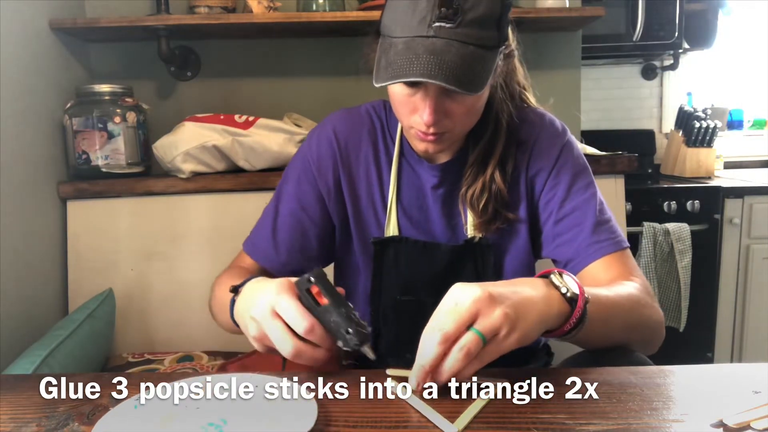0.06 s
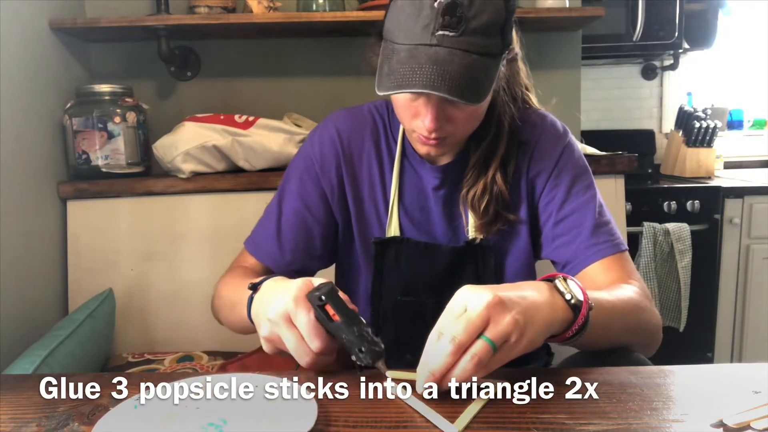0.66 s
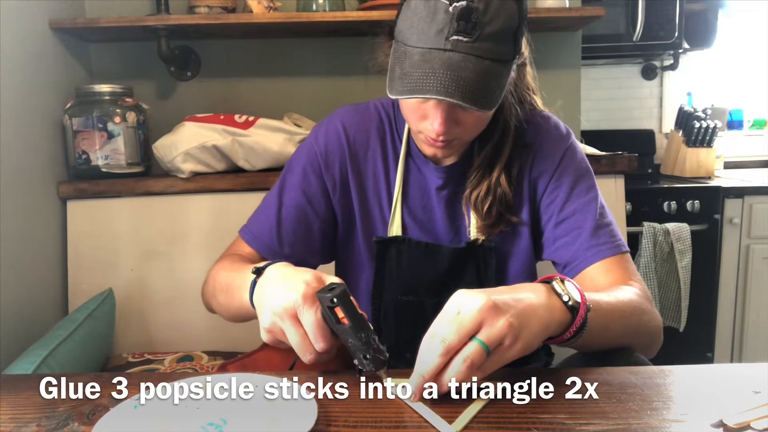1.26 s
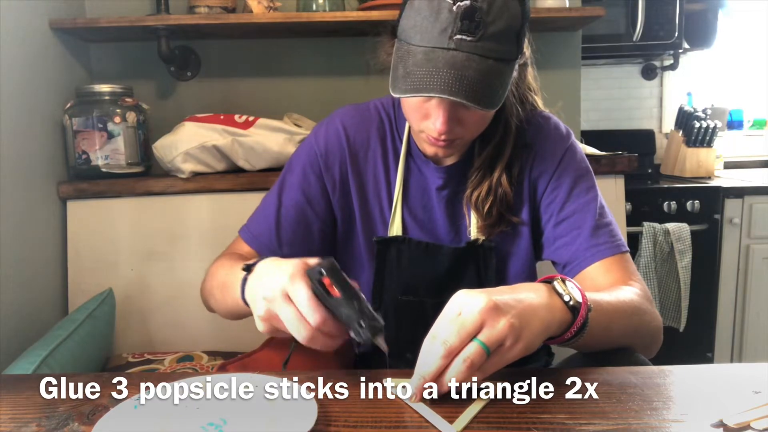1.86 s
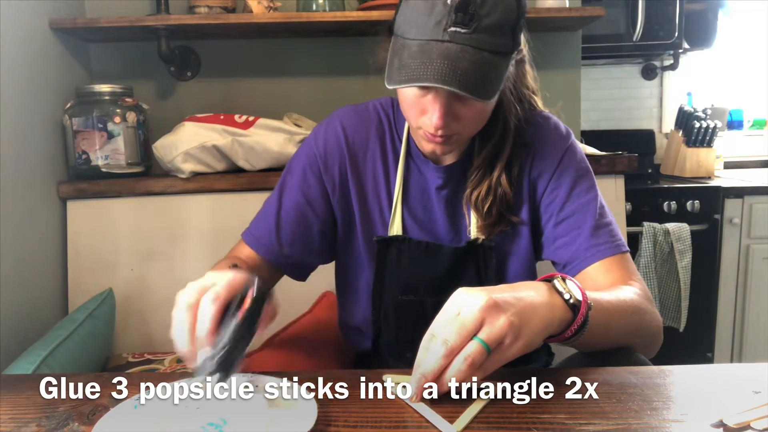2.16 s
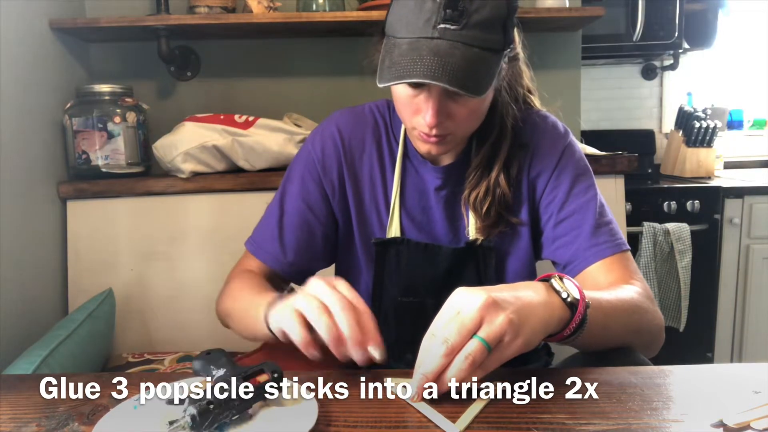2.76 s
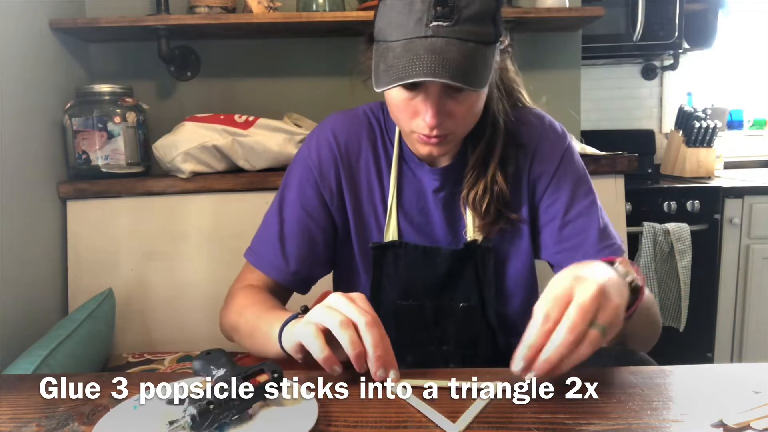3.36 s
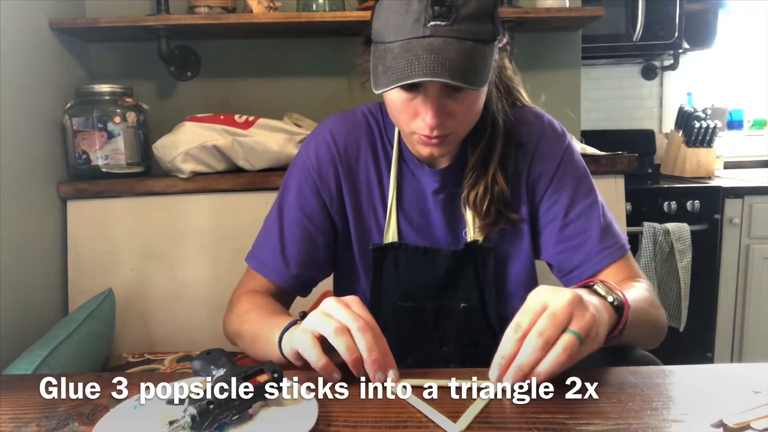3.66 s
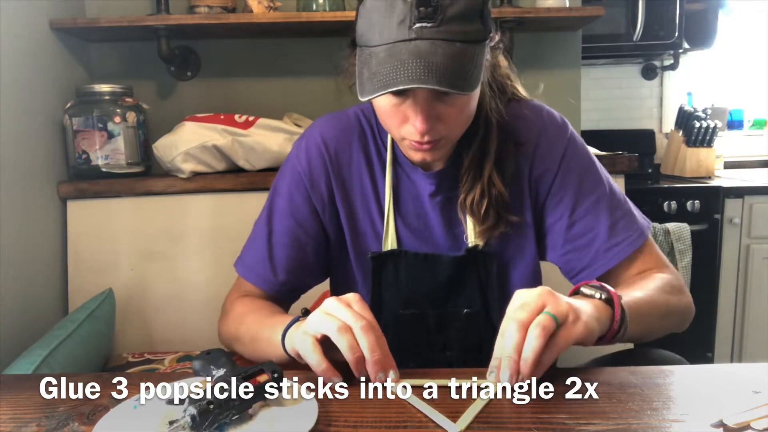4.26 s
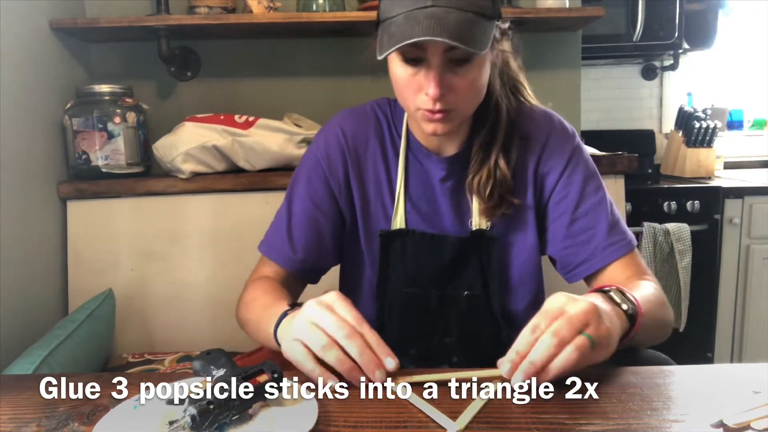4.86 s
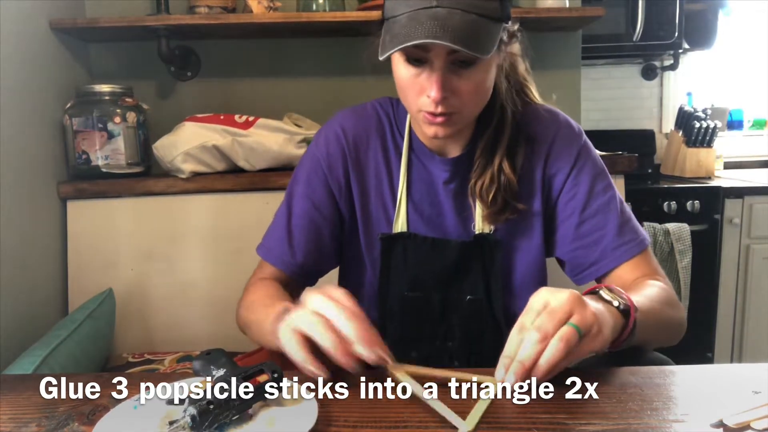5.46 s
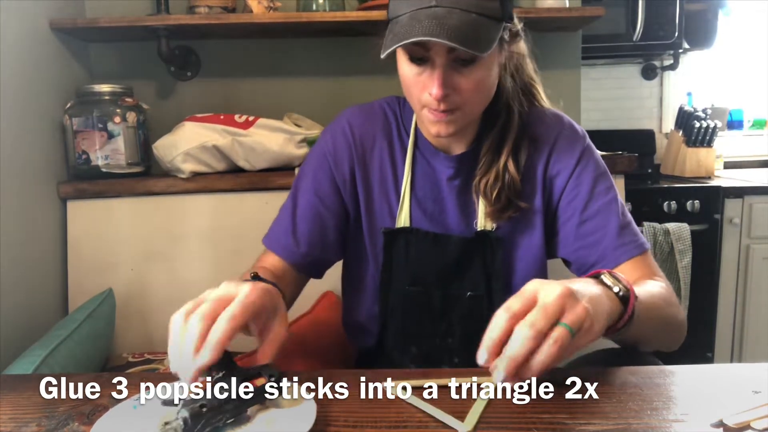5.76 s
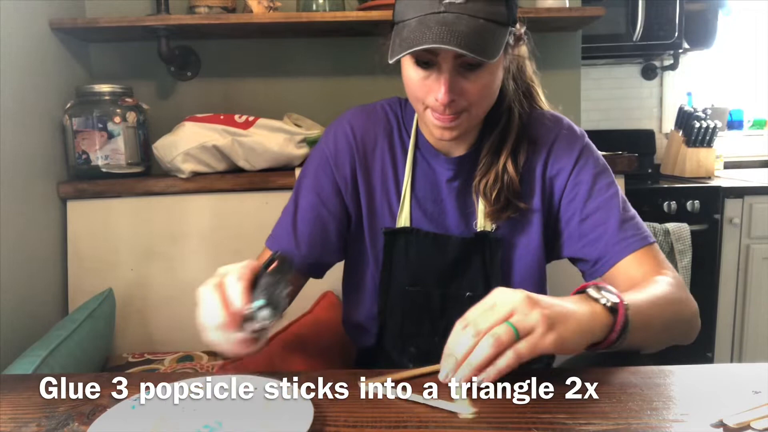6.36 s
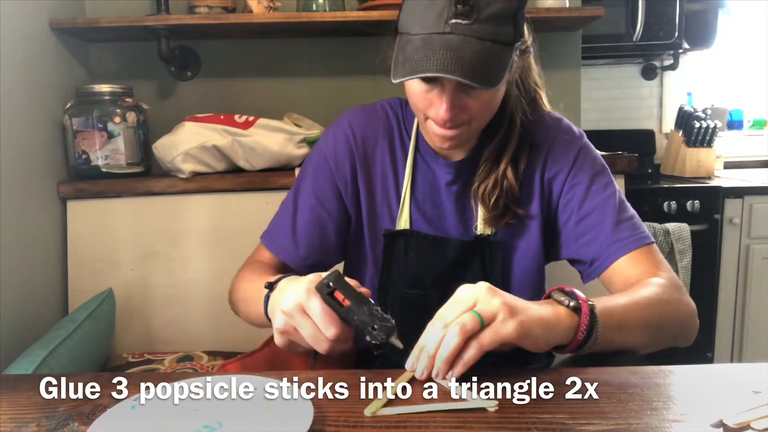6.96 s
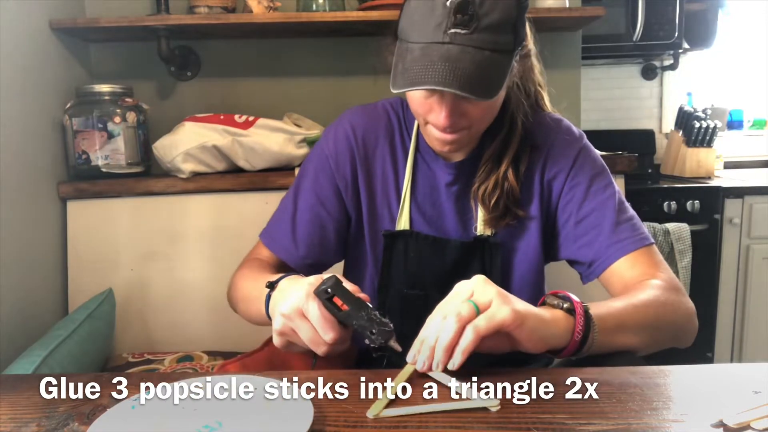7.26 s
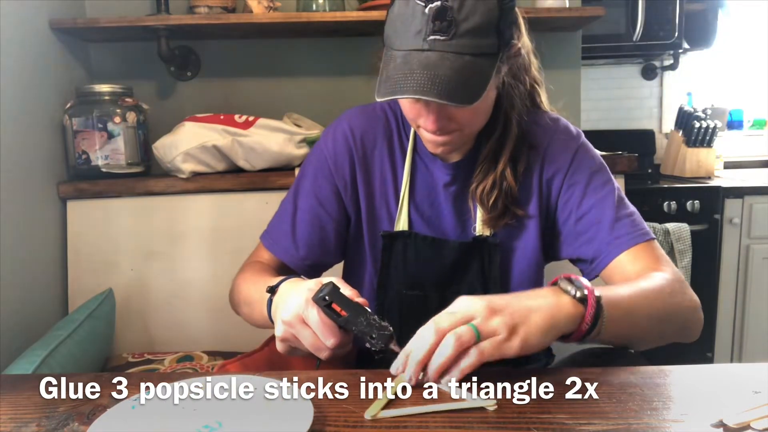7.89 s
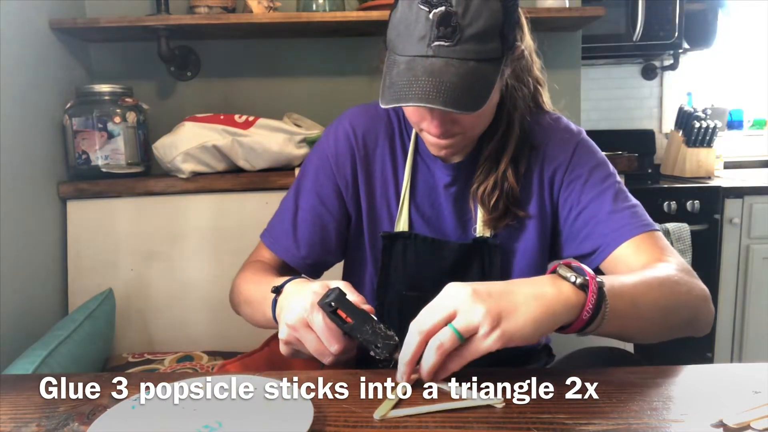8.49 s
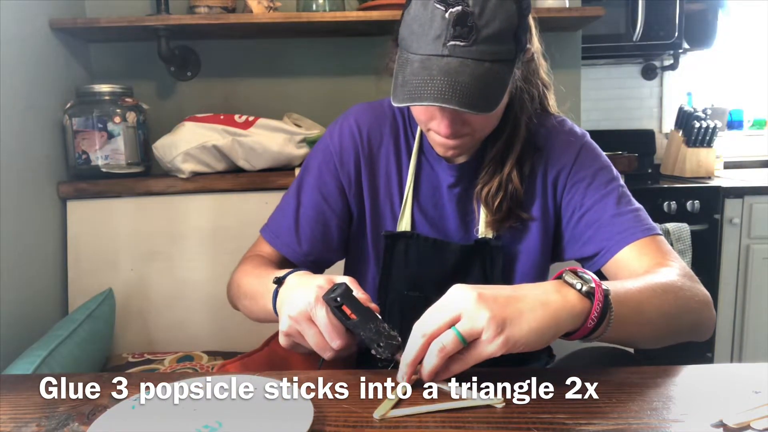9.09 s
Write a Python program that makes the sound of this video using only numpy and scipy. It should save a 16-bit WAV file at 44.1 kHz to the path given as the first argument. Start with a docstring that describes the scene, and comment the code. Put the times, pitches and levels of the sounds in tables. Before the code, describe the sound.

Quiet, close handling sounds at a wooden table in a small room. A glue gun's trigger creaks and clicks, then its cord drags and the plastic body clatters down, the loudest moment. Thin wooden sticks tick and squeak faintly under fingers, with soft thuds. The gun scrapes and knocks as it is lifted, and a few more stick clicks follow over a low, faint hum.

```python
"""Craft sticks are glued together on a wooden table in a small kitchen, over a faint appliance hum.
First a plastic glue gun is squeezed and its rod rasps in the feed; fingers brush, hands bump the
table top and a stick clicks. After two seconds the cord drags and the gun is set down, its hollow
shell clattering. Sticks are tapped and squeak under the fingers. Near six seconds the gun is picked
up, knocking and scraping, and squeezed again; then the last sticks snap down."""
import sys
import numpy as np
from scipy import signal
from scipy.fft import rfft, irfft, next_fast_len
from scipy.io import wavfile
from scipy.ndimage import uniform_filter1d

SR = 44100
rng = np.random.default_rng(int(sys.argv[2]) if len(sys.argv) > 2 else 0)


def dump_mix(stems):
    """Bounce the given channels to the path in sys.argv[1] as a 16-bit WAV at rate SR."""
    frames = np.atleast_2d(stems).T  # one column per channel
    limited = np.clip(frames, -1, 1)  # hard clip at full scale
    pcm = np.round(limited * 32767).astype(np.int16)
    wavfile.write(sys.argv[1], SR, pcm)


N = 402633
AGE = np.arange(SR // 7) / SR   # seconds since a contact

# Knocks of the gun and clicks of its trigger. Each row: start in seconds, relative level in dB,
# hardness from 0 to 1, relative weight on the table in dB, centre of the ring in Hz.
GUN_CONTACTS = [(.454, -48, 0.1, -70, 1890), (1.715, -45.5, 0.9, -54.5, 2800),
                (1.7997, -36, 0.51, -88, 1850), (1.8075, -34.5, 0, -81, 3500), (2.105, -42, 0.1, -55, 1970),
                (2.1584, -41.5, 0, -51, 2330), (2.32, -38.5, 0.77, -47, 1680), (2.4, -36, 0.1, -45, 1500),
                (2.4078, -18.5, 0, -50, 1870), (2.4172, -30, 0, -66, 2700),
                (2.4246, -13.5, 0.48, -49, 1560), (2.4313, -36, 0.2, -45, 1690), (2.445, -29, 0, -50, 2000),
                (2.4543, -21, 0.54, -44, 2370), (2.4565, -14.5, 0.71, -33.5, 2080),
                (2.4643, -23, 0, -41.5, 1270), (2.509, -25.5, .05, -55.5, 2396), (2.517, -20, 0, -52, 1750),
                (2.526, -43, 0.4, -74, 1900), (5.646, -46.5, 0.5, -66, 2750),
                (5.665, -38.5, 0.1, -49, 2200), (5.6725, -32.5, 0, -56, 1600),
                (5.7284, -32.5, 0.1, -71, 1130), (5.7695, -31.5, 0.06, -57, 1770),
                (5.778, -44, 0.4, -49, 1900), (5.973, -51.5, 0.65, -52, 1600),
                (6.211, -41.5, 0.2, -50, 2600), (6.3225, -40.5, 0.54, -59, 1780),
                (6.359, -53, 0.4, -50, 1700), (6.429, -49, 0.5, -50, 1790), (6.743, -43.5, 0.4, -70, 1350),
                (8.524, -56, 0, -90, 1400)]
# Sticks tapped or snapped down. Each row: start in seconds, relative level in dB, hardness from 0 to 1,
# relative weight on the table in dB, freedom to ring from 0 to 1, number of bounces, centre of the ring
# in Hz, scuff length in seconds, top of the crack in Hz, table knock in dB, pitch of the ping in Hz.
STICK_CONTACTS = [(1.206, -50, 0.06, -55, 0.1, 0, 1000, 0.0056, 8000, -53, 7700),
                  (2.967, -46.5, 0, -49.5, 0.15, 1, 2120, 0.01, 9000, -42.5, 7700),
                  (3.4567, -49, 0.3, -40.5, 0.05, 1, 1900, 0.0036, 15000, -41, 7700),
                  (3.4738, -59.5, 0.99, -66.5, 0.1, 1, 2200, 0.0023, 15600, -71, 7560),
                  (4.5625, -53, 0.42, -61, 0.5, 0, 1810, 0.0059, 14000, -59, 7760),
                  (4.569, -45.5, 0.05, -54.5, .1, 3, 1670, 0.0045, 14000, -45, 7700),
                  (4.9733, -41, 0.8, -42.5, 0.1, 3, 2600, 0.0065, 10600, -30.5, 7700),
                  (5.0377, -53, 0.6, -53, 0.57, 0, 2200, 0.0039, 14000, -58, 7700),
                  (5.4563, -34.5, 0.86, -47.5, 0.42, 3, 2290, 0.0011, 16100, -36.5, 7620),
                  (7.4666, -34.5, 0.99, -46.5, 0.8, 1, 2660, 0.0042, 16000, -34, 8020),
                  (7.4867, -44, 0.9, -60, 0.5, 1, 1840, 0.0014, 16000, -43.5, 7950),
                  (7.5041, -43.5, 0.7, -53, 0.4, 0, 1590, 0.0014, 12000, -50, 8000),
                  (7.7069, -45.5, 0.25, -57, 1, 1, 1300, 0.0045, 10000, -45.5, 7530),
                  (8.0512, -45.5, 0.54, -54, 0.8, 1, 1900, 0.0027, 9000, -58, 7500),
                  (8.329, -60, 0.76, -71, 0.47, 0, 2300, 0.0021, 13800, -57, 7600)]


def from_db(db):
    """Amplitude grows tenfold for every 20 dB."""
    return 10 ** (np.asarray(db) / 20)


def rms_one(x):
    """Power normalisation: scale to unit rms."""
    return x / np.sqrt(np.mean(x ** 2) + 1e-20)


def unit_burst(x):
    """Energy normalisation: scale to one millisecond at full level."""
    return x / np.sqrt(np.sum(x ** 2) * 1000 / SR + 1e-20)


def at_hz(points, hz):
    """Interpolate a spectrum on a logarithmic frequency axis."""
    f, value = np.transpose(points)
    return np.interp(np.log(np.maximum(hz, 1)), np.log(f), value)


def colour(x, spectrum):
    """Spectral shaping: weight each frequency of a steady signal; rms 1."""
    size = next_fast_len(len(x))
    hz = np.arange(size // 2 + 1) * SR / size
    return rms_one(irfft(rfft(x, size) * from_db(at_hz(spectrum, hz)), size)[:len(x)])


def add(out, s, sound):
    """Superposition: mix a sound in at s seconds."""
    start = int(np.clip(round(s * SR), 0, N - 1))
    out[start:start + len(sound)] += sound[:N - start]


def decay(t60):
    """Exponential damping: a fall of 60 dB in t60 seconds."""
    return np.exp(-np.minimum(np.log(1000) * AGE / t60, 30))


def onset(rise_s):
    """First-order rise toward full amplitude."""
    return 1 - np.exp(-AGE / rise_s)


def wander(size, window):
    """A moving average leaves only the slow fluctuations of noise; rms 1."""
    return rms_one(uniform_filter1d(rng.standard_normal(size), size=window))


def wavering(hz, width_hz):
    """Narrow-band noise is heard as an unsteady tone; rms 1."""
    band = signal.butter(2, [hz - width_hz / 2, hz + width_hz / 2], "band", fs=SR, output="sos")
    return rms_one(signal.sosfilt(band, rng.standard_normal(N + SR))[SR:])


def background():
    """Broadband room air lies under a narrow-band appliance hum and a drone that recedes early on."""
    # Room air. Each row: frequency in Hz, relative spectral density in dB.
    air_spectrum = [(15, -33), (25, -54), (45, -7), (82, -15), (119, -11), (152, 0), (183, -9.5), (240, -8),
                    (313, -9), (469, -12), (598, -6.5), (666, -13), (1380, -22.5), (2920, -25.5),
                    (15500, -38)]
    # Appliance tones. Each row: frequency in Hz, bandwidth in Hz, level in dB.
    hum_tones = [(62, 11, -80), (94.5, 16, -78.5), (162.6, 15.8, -75), (612, 31, -80)]
    # Envelope of the drone. Each row: time in seconds, level in dB.
    drone_levels = [(0, -65), (.28, -63), (.6, -65.5), (1.5, -74.5), (9.1, -71)]
    air = from_db(-64.66) * colour(rng.standard_normal(N), air_spectrum)
    hum = sum(from_db(db) * wavering(hz, width_hz) for hz, width_hz, db in hum_tones)
    drone_db = np.interp(np.arange(N) / SR, *np.transpose(drone_levels))
    return air + hum + from_db(drone_db) * wavering(hz=237.3, width_hz=21.4)


def friction(spectrum, slips_per_s, spread_db, size=N):
    """Sliding friction is a random train of uneven slips, filtered by the rubbed body; rms 1."""
    slips = from_db(spread_db * np.minimum(rng.exponential(1, size), 4)) * rng.standard_normal(size)
    slipping = rng.random(size) < slips_per_s / SR
    return colour(slips * slipping, spectrum)


def swells(strokes, peak_at):
    """Friction power follows pressure, which grows through each stroke and then lets go."""
    out = np.zeros(N)
    for s, length, db in strokes:
        progress = np.linspace(0, 1, int(length * SR))
        pressure = np.interp(progress, [0, peak_at, 1], [0, 1, 0])
        add(out, s, from_db(db) * np.sqrt(pressure))
    return out


def glue_rod():
    """Friction in the feed makes the rod rasp and creak as the trigger pushes it."""
    # Trigger strokes. Each row: start in seconds, length in seconds, relative level in dB.
    strokes = [(.312, 0.022, -68), (.37, 0.062, -67), (.425, 0.025, -62.5), (1.764, 0.037, -50),
               (6.745, 0.1, -60.5)]
    # Rasp of the rod. Each row: frequency in Hz, relative spectral density in dB.
    spectrum = [(500, -54), (850, -15), (1100, -2), (1300, -19.5), (1700, -4), (2100, -17), (3600, -19.5),
                (5000, -24), (8000, -27.5), (16000, -44)]
    rasp = from_db(4.5) * friction(spectrum, slips_per_s=5900, spread_db=-0.5)
    creak = from_db(7.5) * wavering(hz=1327, width_hz=220)
    return swells(strokes, peak_at=0.47) * (rasp + creak)


def ring(modes, scatter_db, detune):
    """A struck body rings as damped modes; the contact point sets their strength, the grip their pitch."""
    hz, db, t60 = np.transpose(modes)[:, :, None]
    strength, shift = rng.standard_normal((2, len(modes), 1))
    gain = (-1) ** np.arange(len(modes))[:, None] * from_db(db + scatter_db * strength)
    partials = gain * decay(t60) * np.sin(2 * np.pi * hz * (1 + detune * shift) * AGE)
    return unit_burst(np.sum(partials, axis=0))


def struck_near(modes, centre_hz, db_per_octave):
    """Selective excitation: place and hardness of a blow favour the modes around one pitch."""
    return [(hz, db - db_per_octave * abs(np.log2(hz / centre_hz)), t60) for hz, db, t60 in modes]


def chatter(low_hz, high_hz, t60):
    """Modal overlap: countless weak modes and micro-contacts merge into a dying band of noise."""
    band = signal.butter(2, [low_hz, high_hz], "band", fs=SR, output="sos")
    return unit_burst(signal.sosfilt(band, rng.standard_normal(len(AGE)) * decay(t60)))


def snap(width_s):
    """Acceleration noise: a hard edge hitting home radiates one push-pull pressure pulse."""
    phase = AGE / width_s - 3
    return unit_burst(phase * np.exp(-phase ** 2))


def gun_blow(db, hardness, weight_db, centre_hz):
    """An impact rings the plastic shell and the table; the harder it is, the more the edges crack."""
    # Modes of the hollow shell and of its edges. Each row: frequency in Hz, level in dB, t60 in seconds.
    shell_modes = [(935, -7.5, 0.014), (1203, -2.5, 0.021), (1427, -2, 0.02), (1676, -3, 0.018),
                   (1932, -9.5, 0.016), (2330, -3.5, 0.01), (2640, -4.5, 0.011), (3120, 1.5, 0.0075),
                   (3700, 4.5, 0.0045)]
    edge_modes = [(5960, 0, 0.0016), (6550, -16, 0.003), (8340, -4.5, 0.003), (8900, -10, 0.0024),
                  (11300, -2, 0.0013)]
    shell = ring(struck_near(shell_modes, centre_hz, db_per_octave=10), scatter_db=3, detune=0.066)
    shell += from_db(-6) * chatter(0.5 * centre_hz, 1.7 * centre_hz, t60=0.029)
    shell *= onset(0.0012)
    edges = ring(edge_modes, scatter_db=2.5, detune=0.06)
    crack = edges + from_db(-3) * chatter(3500, 12000, t60=0.008) + from_db(3) * snap(0.000036)
    soft_plastic = signal.butter(3, 13500, fs=SR, output="sos")
    crack = from_db(db - 39 + 41 * hardness) * signal.sosfilt(soft_plastic, crack)
    knock = from_db((db + weight_db) / 2 - 7) * table_knock(chatter_db=-4.5)
    return from_db(db - 1.5) * shell + crack + knock


def table_knock(chatter_db):
    """The table top resonates hollowly in its middle range: a few strong modes among many weak ones."""
    # Middle modes of the top. Each row: frequency in Hz, level in dB, t60 in seconds.
    middle_modes = [(342, -3, 0.084), (456, -12.5, 0.1), (605, -2, 0.12), (673, 2.5, 0.075),
                    (750, -6, 0.021)]
    strong = ring(middle_modes, scatter_db=2.5, detune=0.03)
    return unit_burst(strong + from_db(chatter_db) * chatter(380, 1100, t60=0.035))


def glue_gun(rebound_s, loss_db, softening):
    """Inelastic collision: after each knock the gun rebounds once, weaker and softer."""
    out = np.zeros(N)
    for s, db, hardness, weight_db, centre_hz in GUN_CONTACTS:
        add(out, s, gun_blow(db, hardness, weight_db, centre_hz))
        rebound = gun_blow(db, hardness - softening, weight_db, centre_hz)
        add(out, s + rebound_s, from_db(-loss_db) * rebound)
    return out


def fingers_and_cord():
    """Friction follows uneven tugs as fingers brush sticks or gun, and gun and cord drag on the table."""
    # Brushes and drags. Each row: start in seconds, length in seconds, relative level in dB.
    brushes = [(.568, 0.024, -62.5), (5.33, 0.11, -65), (5.783, 0.03, -59), (5.82, .07, -78),
               (5.915, 0.064, -59), (5.968, 0.032, -60), (6.12, 0.087, -74), (6.195, .025, -74),
               (6.32, 0.031, -65), (6.385, .025, -81), (6.422, 0.043, -63.5), (6.91, 0.034, -63.5),
               (7.855, 0.055, -65.5), (7.965, 0.078, -65.5), (8.1, 0.025, -65)]
    drags = [(2.02, 0.22, -58.5), (2.32, 0.06, -48), (5.643, 0.085, -56), (5.79, 0.19, -54.5),
             (5.95, 0.079, -53), (6.02, 0.21, -59.5), (6.13, 0.33, -56.5), (6.31, 0.23, -57.5)]
    # Rubbing of skin and of cord. Each row: frequency in Hz, relative spectral density in dB.
    finger_spectrum = [(800, 5), (2500, -1.5), (5000, -10.5), (6800, -4), (7900, 2.5), (9000, -14),
                       (10800, -4.5), (13000, -24), (16000, -40)]
    cord_spectrum = [(150, -6), (400, 0), (800, -4), (1200, 4), (1700, 1), (2500, -4), (3600, -7),
                     (4800, -15), (9000, -17), (16000, -24)]
    pull = swells(drags, peak_at=0.29)
    touch = swells(brushes, peak_at=0.43) + from_db(-11) * pull   # the hand slides along in each drag
    tugs = from_db(1.2 * wander(N, window=700))
    cord = pull * friction(cord_spectrum, slips_per_s=3800, spread_db=1)
    fingers = touch * friction(finger_spectrum, slips_per_s=2300, spread_db=-0.5)
    return tugs * (fingers + cord)


def table_thuds(rise_s):
    """A slow push excites low table modes; the hand's weight also follows each gun or stick contact."""
    # Low thuds of the table top, under hands or the gun as it is set down and picked up.
    # Each row: start in seconds, relative level in dB, main pitch in Hz.
    thuds = [(0.584, -52.5, 234), (0.709, -46, 149), (1.166, -45.5, 141), (2.332, -42, 135),
             (4.028, -47, 222), (4.142, -44, 224), (5.177, -45.5, 224), (5.355, -44.5, 192),
             (5.705, -49.5, 153), (5.785, -49, 160), (5.995, -47.5, 290), (7.162, -48.5, 224),
             (9.11, -42, 220)]
    # Low modes of the top. Each row: frequency in Hz, level in dB, t60 in seconds.
    low_modes = [(62, -2, 0.17), (111.2, -10.5, 0.14), (126.4, -0.5, 0.084), (161, -6, 0.13),
                 (210.5, 0, 0.13), (236, 0.5, 0.053), (308, -8.5, 0.04), (347.6, -2.5, 0.066)]
    gun_spot_hz, stick_spot_hz = 140, 200   # each spot on the table favours different modes
    behind_gun = [(s + 0.00592, weight_db, gun_spot_hz) for s, _, _, weight_db, _ in GUN_CONTACTS]
    behind_sticks = [(s + 0.0045, weight_db, stick_spot_hz) for s, _, _, weight_db, *_ in STICK_CONTACTS]
    out = np.zeros(N)
    for s, db, hz in list(thuds) + behind_gun + behind_sticks:
        boom = ring(struck_near(low_modes, hz, db_per_octave=10.5), scatter_db=3.5, detune=0.053)
        rumble = chatter(0.88 * hz, 1.483 * hz, t60=0.17) + chatter(300, 750, t60=0.042)
        thud = (boom + from_db(-11) * rumble) * onset(rise_s)
        add(out, s, from_db(db + 8) * unit_burst(thud))
    return out


def scuffed(sound, length_s):
    """Convolution spreads a glancing contact over many small slips."""
    pressure = np.sin(np.pi * np.minimum(AGE / length_s, 1))
    slips = rng.standard_normal(len(AGE)) ** 3
    return unit_burst(signal.fftconvolve(sound, slips * pressure)[:len(AGE)])


def tuned_to(modes, lead_hz):
    """Frequency scaling: sticks differ, so all modes shift until the strongest lies at lead_hz."""
    strongest_hz = max(modes, key=lambda mode: mode[1])[0]
    return [(hz * lead_hz / strongest_hz, db, t60) for hz, db, t60 in modes]


def stick_touch(db, hardness, weight_db, freedom, centre_hz, scuff_s, top_hz, knock_db, ping_hz):
    """Thin wood snaps or scuffs into bending modes; grip damps them, turning a ping into a tick."""
    # Bending modes and short high modes. Each row: frequency in Hz, level in dB, t60 in seconds.
    bending_modes = [(990, 2.5, 0.017), (1300, 5, 0.072), (1644, 5, 0.019), (1790, 2.5, 0.019),
                     (2306, -1.5, 0.052), (2700, 0, 0.013), (3190, 5, 0.015), (3700, 6, 0.0068),
                     (4950, -3, 0.0092)]
    ping_modes = [(6400, -7.5, 0.0021), (7570, -3.5, 0.0052), (8090, 1, 0.0067), (10950, -6, 0.0064),
                  (13700, -9, 0.002)]
    ring_share = 0.35 + 0.65 * freedom   # share of the ringing time that the grip leaves
    held = [(hz, level, t60 * ring_share) for hz, level, t60 in bending_modes]
    bending = ring(struck_near(held, centre_hz, db_per_octave=10), scatter_db=1.5, detune=0.022)
    head_on = np.clip(hardness, 0, 1)
    wood = unit_burst(head_on * bending + (1 - head_on) * scuffed(bending, scuff_s))
    rattle = from_db(1) * chatter(0.14 * centre_hz, 1.47 * centre_hz, t60=0.043) * onset(scuff_s / 3)
    ping = ring(tuned_to(ping_modes, ping_hz), scatter_db=1, detune=0.006)
    tick = chatter(6400, 14200, t60=0.015) + from_db(-21.5) * snap(0.00003)
    dulling = signal.butter(4, top_hz, fs=SR, output="sos")
    crack = unit_burst(signal.sosfilt(dulling, freedom * ping + (1 - freedom) * tick))
    crack_db = db - 23 + 30.5 * hardness
    knock = table_knock(chatter_db=-2.5) * onset(scuff_s)
    return from_db(db - 0.5) * (wood + rattle) + from_db(crack_db) * crack + from_db(knock_db) * knock


def sticks(bounce_s, first_loss_db, later_loss_db, softening):
    """A landing stick loses most of its energy at once; any bounces follow evenly, weaker and softer."""
    out = np.zeros(N)
    for s, db, hardness, weight_db, freedom, bounces, *contact in STICK_CONTACTS:
        add(out, s, stick_touch(db, hardness, weight_db, freedom, *contact))
        for k in range(bounces):
            bounce = stick_touch(db, hardness - softening, weight_db, freedom, *contact)
            add(out, s + (k + 1) * bounce_s, from_db(-first_loss_db - k * later_loss_db) * bounce)
    return out


def scrapes(db_per_octave, slips_per_s):
    """An edge of the gun or a stick catches and slips on the table: friction noise around one pitch."""
    # Scrapes. Each row: start in seconds, length in seconds, relative level in dB, pitch in Hz.
    strokes = [(2.337, 0.069, -51, 1750), (5.154, 0.1, -65, 1780), (5.657, 0.071, -51, 1590),
               (5.845, 0.061, -55.5, 2050), (5.96, 0.033, -60, 1600), (6.025, 0.052, -60, 1620),
               (6.116, 0.053, -56, 1770), (6.172, 0.027, -58, 1830), (6.21, .024, -57, 2520),
               (6.207, 0.025, -55, 570), (6.327, 0.034, -56, 1390), (6.393, .025, -71, 1500),
               (6.416, 0.052, -62, 1710), (7.14, 0.038, -67, 2930), (7.138, 0.045, -65.5, 1170)]
    out = np.zeros(N)
    for s, length, db, hz in strokes:
        envelope = np.sqrt(np.hanning(int(length * SR)))
        spectrum = [(hz * 2. ** octave, -db_per_octave * abs(octave)) for octave in range(-3, 4)]
        judder = friction(spectrum, slips_per_s, spread_db=2.5, size=len(envelope))
        add(out, s, from_db(db) * envelope * judder)
    return out


def squeaks(sag_db, release_s):
    """Stick-slip under the fingers briefly sustains one bending mode of a stick, then lets go."""
    # Squeaks. Each row: start in seconds, level in dB, pitch in Hz, length in seconds.
    slides = [(3.361, -55.5, 2603, 0.041), (4.354, -55.5, 2420, 0.0037), (4.463, -59, 2430, 0.0088),
              (5.038, -53.5, 2310, 0.0096), (5.354, -53, 2380, 0.01)]
    out = np.zeros(N)
    for s, db, hz, length in slides:
        wobble = 1 + 0.047 * wander(len(AGE), window=60)
        tone = np.sin(2 * np.pi * np.cumsum(hz * wobble) / SR)
        hold = from_db(db - sag_db * np.minimum(AGE / length, 1))
        release = np.exp(-np.maximum(AGE - length, 0) / release_s)
        add(out, s, onset(0.0004) * hold * release * tone)
    return out


def kitchen(early_db, early_t60, late_db, bass_t60, air_loss_hz, gap_s):
    """Impulse response of the room: close reflections, then a tail whose treble the air absorbs first."""
    # Colour of the echoes. Each row: frequency in Hz, gain in dB.
    echo_colour = [(100, -5.5), (500, -2.5), (1500, -6.5), (2400, -2.5), (3600, -2.5), (5000, -3),
                   (8000, -15.5), (11000, -6.5), (15000, -7.5)]
    t = np.arange(SR * 3 // 5) / SR
    edges_hz = np.geomspace(60, 17000, 13)
    response = np.zeros(len(t))
    for low, high in zip(edges_hz, edges_hz[1:]):
        hz = np.sqrt(low * high)
        band = signal.butter(2, [low, high], "band", fs=SR, output="sos")
        late_t60 = bass_t60 / np.hypot(1, hz / air_loss_hz)
        for db, t60 in (early_db, early_t60), (late_db, late_t60):
            echoes = rng.standard_normal(len(t)) * from_db(-60 * t / t60) * (t > gap_s)
            echoes = signal.sosfilt(band, echoes)
            share = np.sqrt(2 * (high - low) / SR / np.sum(echoes ** 2))   # energy follows bandwidth
            response += from_db(db + at_hz(echo_colour, hz)) * share * echoes
    return response


def scene():
    """Direct sound and its reverberation in one room add to the background."""
    room = kitchen(early_db=-2.5, early_t60=0.03, late_db=-3, bass_t60=0.43,
                   air_loss_hz=7970, gap_s=0.0061)
    hits = glue_gun(rebound_s=0.0075, loss_db=11, softening=0.29)
    hits += sticks(bounce_s=0.0105, first_loss_db=10.5, later_loss_db=1, softening=0.22)
    hits += squeaks(sag_db=13.5, release_s=0.0016)
    rubs = glue_rod() + fingers_and_cord() + scrapes(db_per_octave=22, slips_per_s=1200)
    thuds = table_thuds(rise_s=0.0052)
    direct = hits + from_db(-3.5) * rubs + thuds
    reverberation = signal.fftconvolve(hits + from_db(-7) * rubs + from_db(2.5) * thuds, room)[:N]
    return (direct + reverberation + background())[None]


def record(dry):
    """Band limiting: the microphone drops the deepest bass, and a steep low-pass cuts the top."""
    bass_cut = signal.butter(2, 30, "high", fs=SR, output="sos")
    treble_cut = signal.ellip(10, 0.2, 70, 15900, fs=SR, output="sos")
    return signal.sosfilt(treble_cut, signal.sosfilt(bass_cut, dry))


dry = scene()
out = record(dry)
dump_mix(out)
```